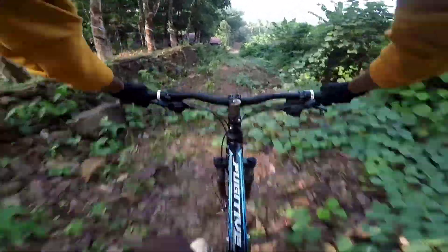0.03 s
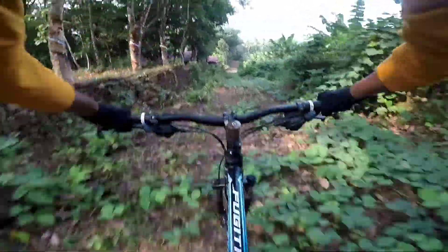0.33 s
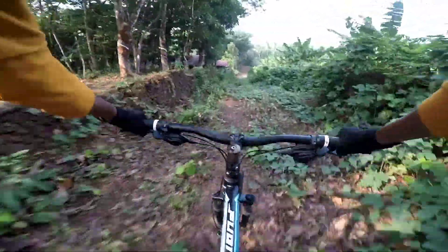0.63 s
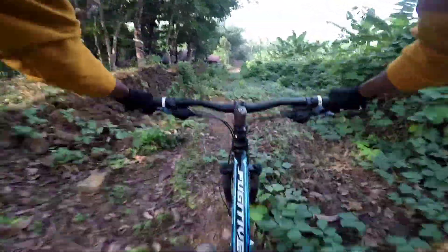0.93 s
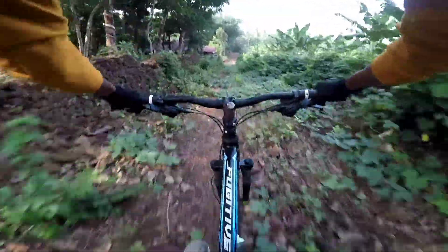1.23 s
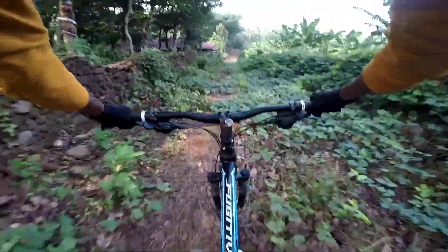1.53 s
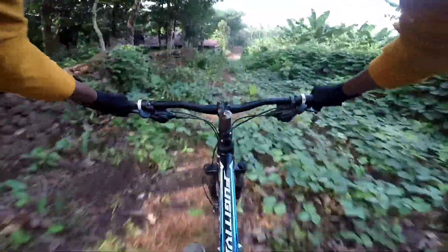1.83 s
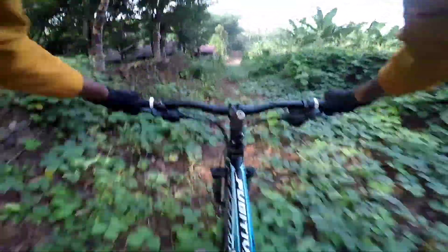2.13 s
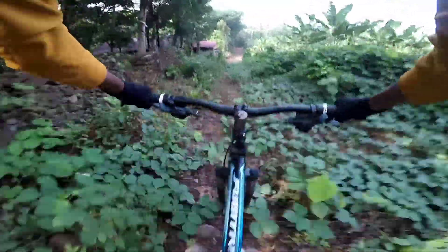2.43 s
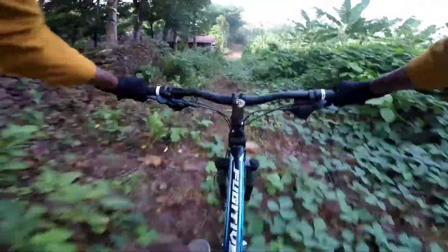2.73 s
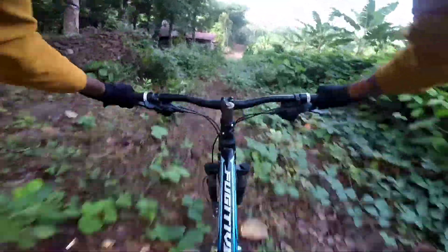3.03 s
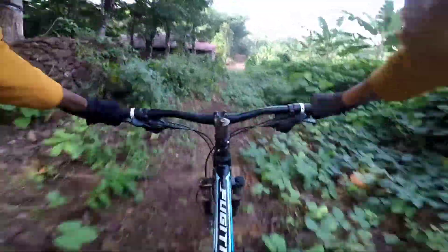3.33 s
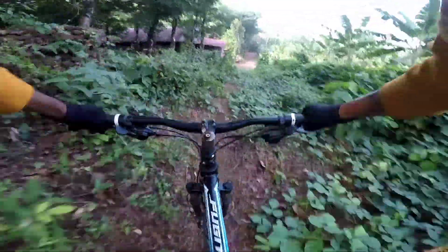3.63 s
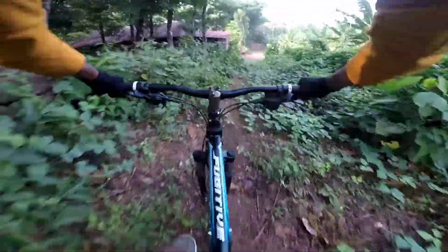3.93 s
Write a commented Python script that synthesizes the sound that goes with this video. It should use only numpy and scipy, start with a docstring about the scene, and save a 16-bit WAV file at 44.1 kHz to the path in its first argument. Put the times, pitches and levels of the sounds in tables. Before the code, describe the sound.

Mountain bike knocking and clattering through crackling leaves, with low wind buffeting and faint bird whistles.

```python
"""A mountain bike knocks and rattles down an overgrown dirt trail, heard from the rider's chest.
Bumps ring the frame and shake loose parts; the tyres thud, drum and crunch through leaf litter.
Stems snap and shoots swipe against the bike, and something rubs with a brief squawk.
Wind buffets the camera's microphone with a low rumble, and a small bird whistles a few times."""
import sys
import numpy as np
from scipy import signal
from scipy.fft import rfft, irfft
from scipy.io import wavfile
from scipy.ndimage import uniform_filter1d

SR = 44100
rng = np.random.default_rng(int(sys.argv[2]) if len(sys.argv) > 2 else 0)


def digitize_waveform(pressure):
    """Quantize a signal to 16-bit integers and store it at the path in sys.argv[1].

    Rows of a 2-D input are taken as channels; values are limited to [-1, 1].
    """
    field = np.atleast_2d(pressure).T
    bounded = np.clip(field, -1, 1)
    quanta = np.round(bounded * 32767).astype(np.int16)
    wavfile.write(sys.argv[1], SR, quanta)


N = 176400

# the bike's hard midrange clack (frequency [Hz], level [dB])
CLACK_SPECTRUM = [(150, -21.5), (400, -7), (600, -1), (820, -6), (1050, 2.5), (1230, 0.5), (1450, -4.5),
                  (1800, -10.5), (2400, -20.5), (3300, -26), (6000, -32), (12000, -99)]
# the bike's low, hollow body (frequency [Hz], level [dB])
BODY_SPECTRUM = [(80, -17), (190, -13.5), (280, -4), (370, -2), (480, -6.5), (650, -12.5), (850, -17.5),
                 (1500, -24), (4000, -84), (10000, -96)]
# the crisp colour of leaves (frequency [Hz], level [dB])
LEAF_SPECTRUM = [(800, -21), (2000, -10.5), (3000, -14.5), (3700, -15.5), (4200, -9), (4700, -1),
                 (5200, -1.5), (5700, 1.5), (6300, -3), (7100, -16), (8400, -14.5), (10000, -20.5),
                 (11700, -31.5), (14000, -37), (16000, -29)]
KNOCK_ATTACK_S = .0011


def knocks():
    """Each bump rings the frame's modes over a chattering clack and a low body."""
    # bumps (time [s], level [dB], body relative to that level [dB], energy decay [s])
    bumps = [(0.209, -20, -8, 0.012), (.289, -29, 2, 0.007), (.324, -22.5, -2, 0.0018),
             (0.341, -26.5, -1, 0.0072), (0.4476, -17.5, -5, 0.0013), (0.6477, -23.5, -18, 0.0042),
             (.729, -23.5, 1, 0.0087), (.741, -23.5, 8, 0.0059), (0.898, -22, -5, 0.0042),
             (1.055, -29, -16, 0.002), (1.138, -23.5, -15, 0.0033), (1.2583, -22, -22, 0.0051),
             (1.346, -28, -4, .002), (1.36, -26.5, -9, 0.0035), (1.522, -24.5, -11, 0.0041),
             (1.672, -24, -13, 0.0096), (1.786, -29, -23, 0.0027), (1.8605, -25.5, -26, 0.0035),
             (1.904, -21, -7, 0.017), (2.0897, -17, -17, 0.0026), (2.3034, -13, -4.5, 0.0031),
             (2.425, -20, -13, 0.0087), (2.546, -25.5, 0, 0.012), (2.6401, -20.5, -14, 0.016),
             (2.673, -14.5, -3, 0.0053), (2.848, -18.5, -6, 0.0042), (2.937, -21, 0.5, 0.003),
             (3.369, -22, -7, 0.025), (3.483, -19, 0, 0.01), (3.753, -19.5, -3.5, 0.0028),
             (3.779, -27.5, 0.5, 0.0043), (3.795, -26, -9, 0.0027), (3.814, -31, -1, 0.0034),
             (3.908, -18, -7, 0.0021), (3.932, -15.5, 0, 0.0055)]
    # resonances of the frame (frequency [Hz], relative level [dB], decay [s])
    frame_modes = [(1051, 4, 0.0081), (1147, 4.5, 0.0052), (1280, -2, 0.0029)]
    out = np.zeros(N)
    for s, db, body_db, decay in bumps:
        frame = undb(-2.5) * struck_modes(frame_modes)
        clack = undb(-1.5) * impact(CLACK_SPECTRUM, KNOCK_ATTACK_S, decay)
        body = undb(body_db) * impact(BODY_SPECTRUM, KNOCK_ATTACK_S, decay)
        add(out, s, undb(db) * (frame + clack + body))
    return out


def clatter():
    """Loose parts chatter all the time, louder where the ground is rough."""
    # roughness of the trail (time [s], relative clack level [dB], body level [dB])
    roughness = [(0, -30, -31), (.22, -30, -33), (.42, -32.5, -35), (.6, -34.5, -37.5), (.78, -29.5, -30),
                 (.85, -34, -33), (.97, -30.5, -33.5), (1.25, -32.5, -35), (1.47, -34, -38),
                 (1.83, -31.5, -40.5), (2.0, -32, -33.5), (2.07, -22.5, -25), (2.17, -29.5, -31),
                 (2.27, -25.5, -21.5), (2.43, -23.5, -24.5), (2.59, -33.5, -31), (2.71, -23.5, -25.5),
                 (2.9, -29, -27), (3.03, -26.5, -26.5), (3.17, -23, -23.5), (3.27, -24, -23.5),
                 (3.34, -34, -31), (3.45, -26, -32.5), (3.53, -23.5, -24), (3.57, -27.5, -26.5),
                 (3.63, -23, -21.5), (3.7, -35.5, -38), (3.85, -31, -35), (4, -30, -25.5)]
    out = np.zeros(N)
    for spectrum, column, db in ((CLACK_SPECTRUM, 1, -2.5), (BODY_SPECTRUM, 2, 0)):
        taps = grains(per_s=700, spread_db=3.24, tail_s=.003, tail_gain=.65)
        ringing = pings(top_hz=2416, decay_s=.0068, spread_db=2.5, count=3500)
        chatter = crunch(taps, ringing, spectrum, ring_share=.6, span_s=.063)
        out += undb(db) * chatter * level_curve(roughness, column)
    return out


def rattles():
    """Rough ground shakes the bike in longer bursts of resonant noise."""
    # bursts (time [s], length [s], level [dB], body relative to the clack [dB])
    bursts = [(0.154, .04, -30.5, 5), (2.761, 0.057, -16, -3), (3.082, .05, -16.5, -1),
              (3.385, .07, -17.5, -12), (3.492, 0.041, -26, 5.5)]
    # the clack of a rattle (frequency [Hz], level [dB])
    rattle_spectrum = [(200, -19.5), (550, -2.5), (850, -6.5), (1100, 4), (1400, 2), (1750, -13),
                       (2500, -20), (10000, -67)]
    out = np.zeros(N)
    for s, length, db, body_db in bursts:
        size = int(length * SR)
        clack = coloured_noise(rattle_spectrum, 8192, span_s=.021)[-size:]
        body = coloured_noise(BODY_SPECTRUM, 8192, span_s=.021)[-size:]
        add(out, s, undb(db) * signal.windows.tukey(size, .5) * (clack + undb(body_db) * body))
    return out


def thuds():
    """The wheels hit the ground and thud dully through the frame."""
    # wheel hits (time [s], level [dB], energy decay [s])
    hits = [(0.043, -18.5, 0.004), (.074, -28, .004), (.182, -12.5, 0.008), (0.22, -13, 0.0043),
            (.241, -21.5, 0.014), (0.537, -24.5, 0.0069), (1.143, -19.5, 0.0065), (1.19, -26, 0.0071),
            (2.181, -11.5, 0.0074), (2.229, -10.5, 0.0048), (2.28, -11.5, 0.0018), (2.323, -21, .005),
            (2.339, -16, .004), (2.4, -16.5, 0.0056), (2.419, -19, 0.0043)]
    # a thud's dull colour (frequency [Hz], level [dB])
    thud_spectrum = [(60, -18), (150, -5), (290, -4), (400, -7.5), (600, -24), (1200, -31), (4000, -68),
                     (10000, -90)]
    out = np.zeros(N)
    for s, db, decay in hits:
        add(out, s, undb(db) * impact(thud_spectrum, attack_s=.00073, decay_s=decay))
    return out


def tread():
    """Tyre knobs drum on firm patches in short, low, wavering tones."""
    # firm patches (time [s], length [s], start pitch [Hz], end pitch [Hz], level [dB])
    patches = [(.94, 0.07, 227, 316, -26.5), (2.172, 0.023, 311, 282, -13.5), (2.22, 0.046, 274, 261, -22),
               (2.37, 0.062, 385, 383, -45), (2.69, 0.12, 369, 397, -29.5), (3.19, 0.13, 283, 375.4, -23)]
    return glides(patches, waver=.06, waver_per_s=126.6)


def squawk():
    """Something rubs, perhaps a brake, with a rough, falling squawk."""
    # rubbing tones (time [s], length [s], start pitch [Hz], end pitch [Hz], level [dB])
    rubs = [(3.385, 0.022, 1240, 1057, -12.5), (3.387, 0.027, 1536, 1455, -19),
            (3.412, 0.037, 1267, 1190, -14.5)]
    return glides(rubs, waver=.04, waver_per_s=590)


def leaves():
    """Leaves crackle under the tyres and along the bike; fine ticks on top differ at each ear."""
    # swell of the rustle (time [s], relative level [dB])
    rustle_levels = [(0, -33), (.16, -37.5), (.26, -27.5), (.41, -34), (.65, -35.5), (.76, -33.5),
                     (.86, -37.5), (.97, -30), (1.09, -36.5), (1.26, -33), (1.35, -36.5), (1.63, -38.5),
                     (1.7, -34.5), (1.84, -37.5), (2.06, -30), (2.2, -32), (2.42, -26.5), (2.52, -34.5),
                     (2.77, -27.5), (2.96, -34.5), (3.06, -32.5), (3.13, -28), (3.2, -30.5), (3.28, -32),
                     (3.35, -37), (3.42, -27), (3.47, -35), (3.51, -27), (3.66, -33.5), (3.72, -40),
                     (3.85, -38.5), (4, -33)]
    # the airy top of the rustle (frequency [Hz], level [dB])
    tick_spectrum = [(8000, -33), (10500, -26), (11700, -1.5), (14000, 5), (15200, -9), (16000, -2)]
    swell = level_curve(rustle_levels) * undb(-1 + wander(per_s=45))
    crackle = pings(top_hz=12050, decay_s=.0047, spread_db=3, count=10000, size=500)
    scratch = grains(per_s=2700, spread_db=3, tail_s=.0036, tail_gain=1)
    rustle = crunch(scratch, crackle, LEAF_SPECTRUM, ring_share=.35, span_s=.13)
    ticks = []
    for db in (-50, -55.5):  # left, right
        specks = grains(per_s=1000, spread_db=3.5, tail_s=.003, tail_gain=.7)
        ticks.append(undb(db) * steady(resonate(specks, tick_spectrum), span_s=.25))
    tick_swell = unit_rms(swell) ** .35  # the ticks follow the rustle only loosely
    return rustle * swell + np.array(ticks) * tick_swell


def snaps():
    """Stems snap against the bike: a leafy burst, a bright edge and a woody ring."""
    # breaking stems (time [s], level [dB], edge and ring relative to the burst [dB], energy decay [s])
    breaks = [(0.065, -34, -10, 0.0041), (0.2865, -19.5, 1, 0.0039), (.353, -24.5, -26, 0.004),
              (.437, -31.5, -19, 0.0038), (.80, -33.5, -7, 0.0044), (1.0, -36, -4, .007),
              (1.158, -28.5, -18, 0.0035), (1.674, -33.5, -4, 0.0025), (1.885, -26, -30, 0.0058),
              (1.922, -32, -25, 0.0064), (1.9725, -18.5, -30, 0.0018), (2.013, -33, -20, 0.0019),
              (2.052, -26.5, -17, .003), (2.096, -28, -21, .002), (2.3699, -17.5, -6.5, 0.0048),
              (2.56, -25.5, -7, 0.003), (2.601, -34, -18, .004), (2.8943, -24.5, -12, 0.0036),
              (3.4301, -27.5, -9, 0.0024), (3.864, -26.5, -12, 0.004), (3.933, -27, -25, 0.0053),
              (3.98, -30, -9, .008)]
    # the bright edge of a snap (frequency [Hz], level [dB])
    edge_spectrum = [(1000, -25), (2500, -9), (4500, 3), (7000, 1), (8600, 6), (10000, -8.5), (12000, -14),
                     (14500, -4), (16000, -35)]
    # woody resonances (frequency [Hz], level relative to the edge [dB], decay [s])
    stem_modes = [(1570, -7, .008), (2190, -9, 0.0092), (4700, -4, .007)]
    attack_s = .0014
    out = np.zeros(N)
    for s, db, edge_db, decay in breaks:
        crack = impact(edge_spectrum, attack_s, decay) + struck_modes(stem_modes)
        burst = impact(LEAF_SPECTRUM, attack_s, decay)
        add(out, s, undb(db) * (burst + undb(edge_db) * crack))
    return out


def swishes():
    """Shoots slide along the bike, each a soft swell of leaf noise."""
    # passing shoots (time [s], length [s], level [dB])
    shoots = [(1.237, 0.069, -38), (2.028, 0.08, -35), (2.682, 0.038, -29), (2.766, 0.047, -30),
              (3.237, 0.08, -26.5)]
    out = np.zeros(N)
    for s, length, db in shoots:
        size = int(length * SR)
        hiss = unit_rms(resonate(rng.standard_normal(size), LEAF_SPECTRUM))
        add(out, s, undb(db) * arch(size) * hiss)
    return out


def wind():
    """Eddies buffet the microphone in puffs over a slow sway of pressure."""
    # gusts (time [s], relative level [dB])
    gusts = [(0, -22), (.12, -20), (.2, -15), (.28, -25), (.36, -21.5), (.45, -28.5), (.8, -31),
             (.92, -26.5), (1.0, -23), (1.16, -18.5), (1.32, -26.5), (1.45, -20.5), (1.68, -28.5),
             (1.75, -21), (1.86, -26.5), (2.0, -20.5), (2.22, -22.5), (2.3, -19), (2.41, -16), (2.5, -25),
             (2.78, -22.5), (3.12, -29.5), (3.24, -24), (3.45, -29), (3.65, -19.5), (3.78, -28),
             (3.86, -30.5), (3.96, -18), (4, -21.5)]
    # rumble of the eddies (frequency [Hz], level [dB])
    eddy_spectrum = [(20, -22), (40, 3.5), (60, 4.5), (100, -4.5), (160, -9.5), (250, -19), (500, -38),
                     (1500, -71), (8000, -120)]
    # sub-bass sway (frequency [Hz], level [dB])
    sway_spectrum = [(5, -6.5), (12, 9.5), (24, 4.5), (36, -8.5), (55, -19.5), (150, -42), (2000, -130)]
    puffs = undb(-1.5 + 3 * np.tanh(wander(per_s=30)))
    eddies = coloured_noise(eddy_spectrum, N, span_s=.066) * puffs
    sway = coloured_noise(sway_spectrum, N, span_s=.14) * undb(7)
    return (eddies + sway) * level_curve(gusts)


def jolts():
    """Hard bumps and buffets shake the microphone: bass thumps about one cycle long."""
    # thumps (time [s], starting envelope level [dB], frequency [Hz])
    thumps = [(.137, -11, 55), (0.186, -1.5, 94), (.219, 3, 111), (0.355, -4, 35), (0.974, -14, 70),
              (1.138, -12, 99), (1.185, -12, 80), (1.44, -12, 44.6), (2.13, -12, 110), (2.28, -7.5, 119),
              (2.337, -9, 34.3), (2.397, -3, 79), (3.656, -6.5, 30.2)]
    fade_cycles = .88
    t = np.arange(SR // 4) / SR
    out = np.zeros(N)
    for s, db, hz in thumps:
        fade = np.exp(-(hz * t / fade_cycles) ** 2)
        add(out, s, undb(db) * np.sin(2 * np.pi * hz * t) * fade)
    return out


def bird():
    """A small bird gives thin, high, slightly rough whistles."""
    # notes (time [s], length [s], start pitch [Hz], end pitch [Hz], level [dB])
    notes = [(.078, .028, 8400, 7650, -39), (0.674, 0.046, 5630, 5530, -28.5),
             (.895, 0.072, 6730, 6850, -30), (.96, .03, 11350, 11300, -48), (1.142, 0.063, 5570, 5730, -31),
             (1.692, 0.026, 7300, 7500, -45)]
    return glides(notes, waver=.006, waver_per_s=560)


def impact(spectrum, attack_s, decay_s, size=6000):
    """A brief chattering contact rings a body; its loudest 5 ms have rms 1."""
    t = np.arange(size) / SR
    chatter = coloured_noise(spectrum, 2 * size, span_s=.0073)[size:]
    rise = 1 - np.exp(-t / attack_s)
    fall = np.exp(-np.maximum(t - 2 * attack_s, 0) / (2 * decay_s))
    hit = chatter * rise * fall
    return hit / np.sqrt(uniform_filter1d(hit ** 2, int(.005 * SR)).max())


def struck_modes(modes, size=6000):
    """An object's damped modes, tuned a little differently at every blow."""
    t = np.arange(size) / SR
    detunes = 1 + .034 * rng.standard_normal(len(modes))
    ringing = sum(undb(db) * np.sin(2 * np.pi * hz * detune * t) * np.exp(-t / decay)
                  for (hz, db, decay), detune in zip(modes, detunes))
    return ringing * (1 - np.exp(-t / KNOCK_ATTACK_S))


def glides(notes, waver, waver_per_s):
    """Short gliding tones that swell and fade, their pitch unsteady."""
    out = np.zeros(N)
    for s, length, start_hz, end_hz, db in notes:
        size = int(length * SR)
        hz = np.linspace(start_hz, end_hz, size) * (1 + waver * wander(waver_per_s)[:size])
        tone = np.sqrt(2) * np.sin(2 * np.pi * np.cumsum(hz) / SR)
        add(out, s, undb(db) * arch(size) * tone)
    return out


def grains(per_s, spread_db, tail_s, tail_gain):
    """Random tiny impacts of uneven size, each with a short scratchy tail."""
    onsets = rng.random(N) < per_s / SR
    hits = onsets * undb(spread_db * np.minimum(rng.exponential(size=N), 5))
    pole = np.exp(-1 / (tail_s * SR))
    tails = np.sqrt(signal.lfilter([1 - pole], [1, -pole], hits ** 2))
    return hits * rng.choice([-1, 1], N) + tail_gain * tails * rng.standard_normal(N)


def pings(top_hz, decay_s, spread_db, count, size=900):
    """Tiny contacts at random moments, each ringing briefly at its own pitch."""
    when, pitch, strength = rng.random((count, 3)).T[:, :, None]
    age = np.arange(size)
    gain = undb(spread_db * np.minimum(-np.log(strength), 5))
    phase = (2 * np.pi * top_hz / SR * pitch * age).astype(np.float32)
    fade = np.exp(-age / (decay_s * SR)) * (1 - age / size)
    positions = (when * N).astype(int) + age
    return np.bincount(positions.ravel(), (gain * np.sin(phase) * fade).ravel(), N)[:N]


def crunch(scratch, ringing, spectrum, ring_share, span_s):
    """Scratchy and ringing grains together, coloured by a body, at a steady rms of 1."""
    scratch = np.sqrt(1 - ring_share) * unit_rms(resonate(scratch, spectrum))
    ringing = np.sqrt(ring_share) * unit_rms(resonate(ringing, spectrum))
    return steady(scratch + ringing, span_s)


def coloured_noise(spectrum, size, span_s):
    """Noise through a resonant body, at a steady rms of 1."""
    return steady(resonate(rng.standard_normal(size), spectrum), span_s)


def resonate(x, spectrum, size=8192):
    """Pass x through a resonant body with the given spectrum."""
    hz, db = np.array(spectrum).T
    bins_hz = np.maximum(np.fft.rfftfreq(size, 1 / SR), 1)
    gain = undb(np.interp(np.log(bins_hz), np.log(hz), db))
    cepstrum = irfft(np.log(gain))
    cepstrum[1:size // 2] *= 2  # minimum phase: the body rings only after it is hit
    cepstrum[size // 2 + 1:] = 0
    response = irfft(np.exp(rfft(cepstrum)))
    return signal.fftconvolve(x, response)[:len(x)]


def steady(x, span_s):
    """Hold the rms over span_s at 1, keeping the fine grain."""
    return x / np.sqrt(uniform_filter1d(x ** 2, int(span_s * SR)) + 1e-12)


def wander(per_s):
    """Smooth random drift with rms 1."""
    hold = max(int(SR / per_s), 2)
    steps = np.repeat(rng.standard_normal(N // hold + 1), hold)
    return unit_rms(uniform_filter1d(steps, hold)[:N])


def level_curve(rows, column=1):
    """Gain over time from one dB column of a table."""
    rows = np.array(rows)
    return undb(np.interp(np.arange(N) / SR, rows[:, 0], rows[:, column]))


def arch(size):
    """A half-sine swell and fade."""
    return np.sin(np.linspace(0, np.pi, size))


def undb(db):
    """Decibels to gain."""
    return 10 ** (np.asarray(db) / 20)


def unit_rms(x):
    """Scale to rms 1."""
    return x / np.sqrt(np.mean(x ** 2))


def add(out, s, sound):
    """Mix a sound in at s seconds."""
    start = max(int(s * SR), 0)
    out[start:start + len(sound)] += sound[:max(N - start, 0)]


def scene():
    """Everything sits in the centre, apart from the airy top of the rustle."""
    bike = knocks() + clatter() + rattles() + thuds() + tread() + squawk()
    foliage = leaves() + snaps() + swishes()
    return bike + foliage + wind() + jolts() + bird()


def record(dry):
    """The camera clips the highest peaks and cuts the top of the treble."""
    top_hz = 15400
    lowpass = signal.ellip(8, .2, 70, top_hz, fs=SR, output="sos")
    return signal.sosfilt(lowpass, np.clip(dry, -.95, .95))


dry = scene()
out = record(dry)
digitize_waveform(out)
```